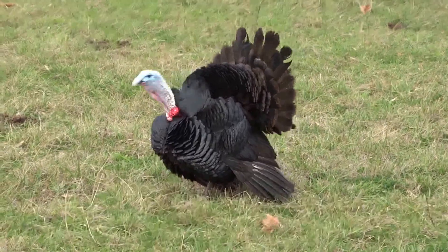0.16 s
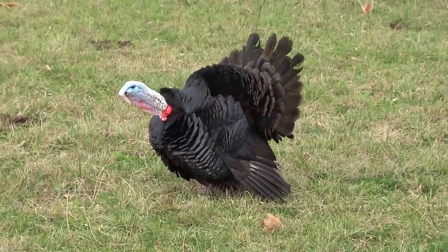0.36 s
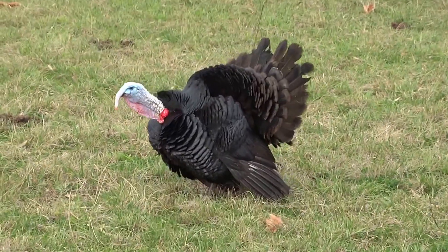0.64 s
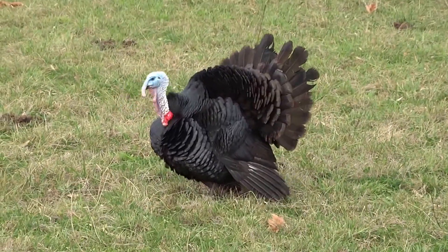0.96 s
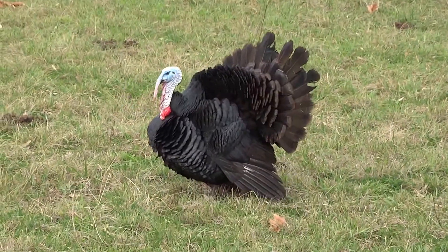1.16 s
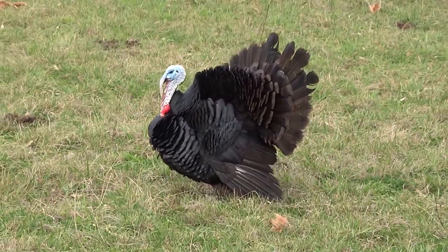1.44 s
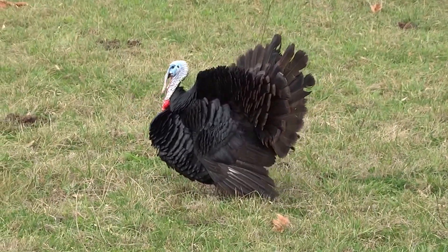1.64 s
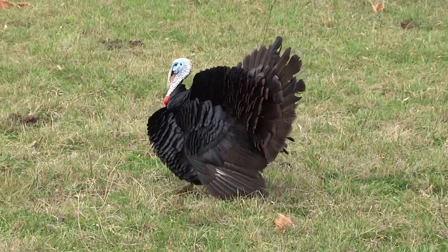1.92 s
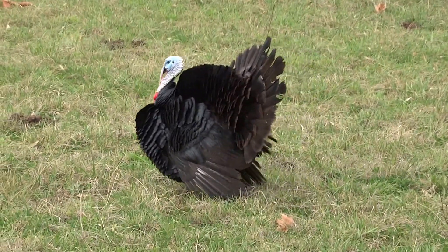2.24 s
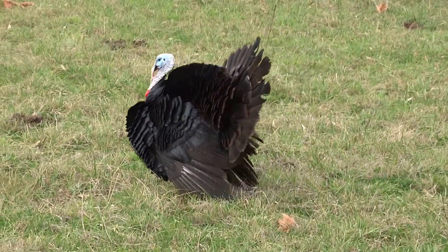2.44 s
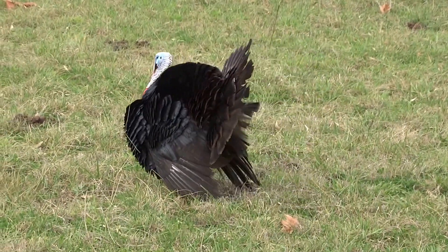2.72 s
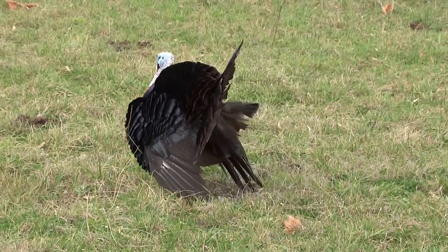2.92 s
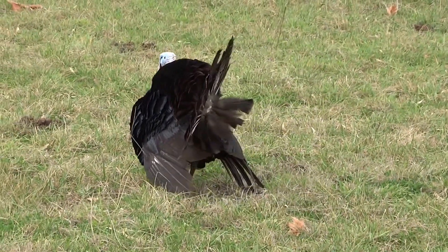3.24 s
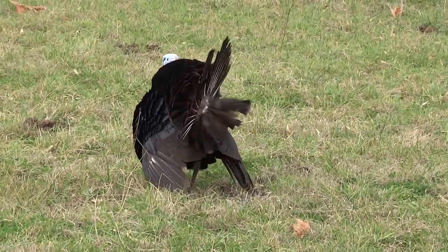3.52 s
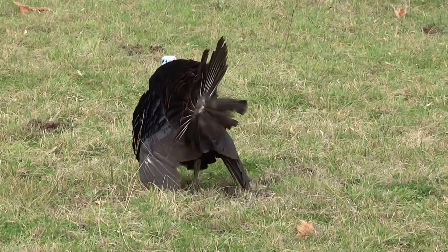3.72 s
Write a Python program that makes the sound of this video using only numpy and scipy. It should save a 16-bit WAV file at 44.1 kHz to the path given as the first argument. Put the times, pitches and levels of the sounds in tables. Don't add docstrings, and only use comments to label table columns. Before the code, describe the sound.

Close, clear turkey gobble lasting under a second in an open field, then soft footsteps and feathers brushing grass. Far fowl yelp and cry faintly; low steady rumble and soft air continue in near-centred stereo.

```python
import sys
import numpy as np
from scipy import signal
from scipy.fft import rfft, irfft, next_fast_len
from scipy.io import wavfile
from scipy.ndimage import uniform_filter1d

SR = 44100
rng = np.random.default_rng(int(sys.argv[2]) if len(sys.argv) > 2 else 0)


def to_linear_factor(level_db):
    exponent = np.asarray(level_db, float) / 20
    return 10 ** exponent


def output_pcm(signal):
    pcm = np.clip(np.atleast_2d(signal).T, -1, 1) * 32767
    wavfile.write(sys.argv[1], SR, np.round(pcm).astype(np.int16))


N = 170667
FLUTTER_HZ = 297


def rms_one(x):
    return x / np.sqrt(np.mean(x ** 2) + 1e-20)


def coloured(x, points):
    hz = np.maximum(np.arange(N // 2 + 1) * SR / N, 1)
    p = np.array(points)
    outline_db = np.interp(np.log(hz), np.log(p[:, 0]), p[:, 1], left=-99, right=-99)
    return rms_one(irfft(rfft(x) * to_linear_factor(outline_db), N))


def noise(points):
    return coloured(rng.standard_normal(N), points)


def drift(rate_hz, size):
    r = np.exp(-2 * np.pi * rate_hz / SR)
    white = rng.standard_normal(size + SR // 2)
    return rms_one(signal.lfilter([1], [1, -2 * r, r * r], white)[SR // 2:])


def swells(rows):
    t = np.arange(N) / SR
    return sum(to_linear_factor(db) * np.exp(-(2 * (t - s) / length) ** 2) for s, length, db in rows)


def controls(rows):
    s, *columns = np.transpose(rows)
    n = np.arange(max(int(s[0] * SR), 0), int(s[-1] * SR))
    glide = int(.0022 * SR) + 1
    return n, [uniform_filter1d(np.interp(n / SR, s, c), glide, mode="nearest") for c in columns]


def short_note(s, length, db, first_hz, last_hz, *beak):
    fade_db = 20
    return [(s + length * u, first_hz + (last_hz - first_hz) * u, db - fade_db * dip, *beak)
            for u, dip in [(0, 1), (.27, 0), (.65, .12), (1, 1)]]


def tones(n, hz, gains, orders, rough):
    wobble = 0.0624 * rough * drift(FLUTTER_HZ, len(n))
    phase = 2 * np.pi * np.cumsum(hz * (1 + wobble)) / SR
    depth = np.clip(rough * (1 + .3 * (orders - 1)), 0, 3)
    chance = np.array([drift(FLUTTER_HZ, len(n)) for _ in range(6)])
    flutter = (1 + depth * chance[np.arange(len(orders)) % 6]) / np.sqrt(1 + depth ** 2)
    wave = np.sum(gains * flutter * np.sin(orders * phase), axis=0)
    ends = np.minimum(1, np.minimum(n - n[0], n[-1] - n) / 60)
    return ends * wave / np.sqrt(np.sum(gains ** 2, axis=0) / 2)


def whistles(rows):
    out, one = np.zeros(N), np.ones((1, 1))
    for row in rows:
        n, (hz, db) = controls(short_note(*row))
        rough = .75 * 1500 / hz
        out[n] += to_linear_factor(db) * tones(n, hz, one, one, rough)
    return out


# frequency in Hz, level in dB per Hz.
DRONE_COLOUR = [(20, -21), (64, -18), (97, -1.5), (160, -12), (330, -20.5), (400, -51)]
# centre in Hz, width in Hz, level in dB.
DRONE_HUMPS = [(98.7, 26.8, -40.5), (132.9, 9.2, -49.5), (212.5, 20, -52.5)]
# frequency in Hz, level in dB.
HUMS = [(737, -60.5), (834, -60)]
# frequency in Hz, level in dB per Hz.
TRAFFIC_COLOUR = [(200, -8), (300, -5.5), (440, -4.5), (600, -3.5), (860, -5), (1000, -14.5)]
# frequency in Hz, level in dB per Hz.
AIR_COLOUR = [(750, -9), (1000, -2.5), (1750, 1), (3100, -6.5), (5500, -19), (7700, -20.5), (14100, -52.5)]


def background():
    drone_db, traffic_db, air_db = -39.5, -49, -52.5
    out = to_linear_factor(drone_db) * noise(DRONE_COLOUR)
    for hz, width_hz, db in DRONE_HUMPS:
        out += to_linear_factor(db) * noise([(hz + k * width_hz, -12 * abs(k)) for k in (-2, 0, 2)])
    for hz, db in HUMS:
        hum = np.sin(2 * np.pi * hz * np.arange(N) / SR)
        out += np.sqrt(2) * to_linear_factor(db + 2.0 * drift(1, N)) * hum
    out += to_linear_factor(traffic_db + 1.0 * drift(4.9, N)) * noise(TRAFFIC_COLOUR)
    return out + to_linear_factor(air_db + 1.0 * drift(13.5, N)) * noise(AIR_COLOUR)


# frequency in Hz, level in dB per Hz.
WIDE_COLOUR = [(30, -47), (103, -3.5), (800, 5), (1100, 0), (3800, -8.5), (12000, -45)]


def wide_air():
    return to_linear_factor(-59) * noise(WIDE_COLOUR)


# start in seconds, level in dB, pitch in Hz.
PEEP_CALLS = [
    (-.01, -42, 1360),
    (1.03, -49, 2060),
    (2.803, -43, 1280),
    (2.994, -57, 2800),
    (3.035, -58, 3100),
    (3.10, -50, 1300),
]


def peeps():
    length_s = 0.056
    return whistles([(s, length_s, db, hz, hz) for s, db, hz in PEEP_CALLS])


# time in seconds, pitch in Hz, level in dB, gape 0-1, brightness in dB.
LONG_1 = [(.124, 555, -35, 0.9, -24), (.13, 593, -18.5, 0.75, -19), (.14, 625, -13.5, 0.62, -33),
          (.156, 650, -11.5, 0.6, -39), (.163, 672, -23, 0.47, -30), (0.173, 700, -26, 0.35, -18),
          (0.182, 712, -20.5, 0.2, -17.5), (.189, 792, -19, 0.2, -5)]
LONG_2 = [(0.364, 515, -42, 0.54, -15), (.374, 611, -22, 0.31, -20), (.388, 677, -22.5, 0.43, -1.5),
          (0.403, 676, -24.5, 0.58, -5), (0.415, 600, -28, 0.16, -7.5), (0.43, 470, -39.5, 0.54, -31)]
LONG_3 = [(0.528, 513, -32.5, 0.35, -15), (0.541, 546.6, -20, 0.4, -19), (0.57, 640, -19.5, 0.57, 6),
          (0.578, 671, -24.5, 0.46, -18), (0.593, 663, -25.5, 0.55, 2.5), (0.605, 575, -27.5, 0.27, -6),
          (0.622, 480, -47, 0.28, -21)]
LONG_4 = [(0.777, 552, -36, 0.32, -4), (0.788, 613, -33, 0.86, -7.5), (0.799, 628, -33.5, 0.41, -10),
          (0.811, 559, -36, 0.33, 2), (0.821, 580, -43, 0.97, -3)]
LONG_HIGHS_DB = [-6.5, -5.5, -2.5, -5]
# start in seconds, length in seconds, level in dB, first Hz, last Hz.
WIDE_NOTES = [
    (.027, 0.026, -30.5, 416, 510),
    (.048, 0.025, -18, 650, 497),
]
# start in seconds, length in seconds, level in dB, first Hz, last Hz.
DULL_NOTES = [
    (.101, 0.024, -27.5, 564, 770),
    (.252, 0.019, -20, 582, 520),
    (.315, 0.017, -15.5, 557, 524),
    (.331, 0.021, -19.5, 575, 490),
    (.350, 0.019, -32.5, 673, 706),
    (.457, 0.019, -25, 528, 497),
    (.513, 0.017, -20, 576, 491),
    (.690, 0.037, -27.5, 657, 502),
]
# start in seconds, length in seconds, level in dB, first Hz, last Hz.
BRIGHT_NOTES = [
    (.186, 0.032, -22.5, 815, 596),
    (.261, 0.034, -25, 690, 528),
    (.327, 0.011, -26, 636, 577),
    (.471, 0.027, -28, 593, 497),
    (.661, 0.023, -28.5, 579, 448),
]
# start in seconds, length in seconds, level in dB, first Hz, last Hz.
LEAD_NOTES = [
    (.238, 0.017, -33.5, 632, 555),
    (.306, 0.012, -35.5, 620, 524),
    (.444, 0.017, -34, 565, 593),
    (.499, 0.021, -29.5, 577, 555),
]
# start in seconds, length in seconds, level in dB, first Hz, last Hz.
CLOSED_NOTES = [
    (.643, 0.021, -29, 617, 428),
    (.681, 0.014, -31, 423, 462),
    (.850, 0.032, -30.5, 628, 374),
]
# start in seconds, length in seconds, level in dB, first Hz, last Hz.
GULP_NOTES = [
    (.216, 0.016, -33, 610, 600),
    (.231, .01, -38, 634, 620),
    (.488, 0.014, -39, 517, 480),
    (.876, .022, -38, 765, 640),
]
# gape 0-1, brightness in dB, roughness (below 0: no flutter), level above 4
# kHz in dB.
WIDE_SHAPE = (0.69, -6, 0.24, -8)
DULL_SHAPE = (0.49, -17, 0.15, -14)
BRIGHT_SHAPE = (.38, -6, .3, -7)
LEAD_SHAPE = (1, -18, -0.14, -18)
CLOSED_SHAPE = (0.37, -15.5, 0.37, -16)
GULP_SHAPE = (0.15, -20, 0.5, -19)
# centre in Hz, width in Hz, level in dB.
THROAT_PEAKS = [(1803, 206, -4), (2784, 360, -1.5), (3096, 111, 1), (4686, 490, -14), (6900, 3050, -21.5),
                (9200, 3300, -52)]


def gobble_notes():
    long_rough = .045
    notes = []
    for rows, highs_db in zip((LONG_1, LONG_2, LONG_3, LONG_4), LONG_HIGHS_DB):
        notes.append([(*row, long_rough, highs_db) for row in rows])
    for rows, beak in [(DULL_NOTES, DULL_SHAPE), (BRIGHT_NOTES, BRIGHT_SHAPE), (LEAD_NOTES, LEAD_SHAPE),
                       (WIDE_NOTES, WIDE_SHAPE), (CLOSED_NOTES, CLOSED_SHAPE), (GULP_NOTES, GULP_SHAPE)]:
        notes += [short_note(*row, *beak) for row in rows]
    return notes


def gobble():
    shut_hz, open_hz, first_width_hz, chest_db = 650, 1750, 318, -25
    out, orders = np.zeros(N), np.arange(1, 25)[:, None]
    for rows in gobble_notes():
        n, (hz, db, gape, bright_db, rough, highs_db) = controls(rows)
        f = orders * hz
        first_hz = shut_hz + (open_hz - shut_hz) * gape
        gains = 1 / (1 + (2 * (f - first_hz) / first_width_hz) ** 2)
        gains = gains + to_linear_factor(chest_db) * (orders < 2)
        yielding_db = highs_db - .8 * np.maximum(db + 26.5, 0)
        for top_hz, width_hz, top_db in THROAT_PEAKS:
            shift_db = bright_db if top_hz < 4000 else yielding_db
            gains = gains + to_linear_factor(top_db + shift_db) / (1 + (2 * (f - top_hz) / width_hz) ** 2) ** 0.97
        uneven_db = 3.5 * np.array([drift(32, len(n)) for _ in range(5)])[orders[:, 0] % 5]
        effort_db = .7 * np.minimum(db + 24.0, 0)
        gains = gains * to_linear_factor(uneven_db * (orders > 2) + effort_db * (f > 4000))
        gains = gains / (1 + (f / 11000) ** 4)
        out[n] += to_linear_factor(db) * tones(n, hz, gains, orders, rough)
    return out


def port_skew(voice):
    quarter_turn = np.imag(signal.hilbert(voice, next_fast_len(N))[:N])
    low_pass = signal.butter(1, 2200, fs=SR, output="sos")
    return to_linear_factor(-17) * signal.sosfiltfilt(low_pass, quarter_turn)


def echoes(x):
    far_db, far_t60_s = -17, .9
    near_db, near_t60_s = -13, .14
    apart_share = .3
    t = np.arange(SR // 2) / SR
    fall = to_linear_factor(far_db - 60 * t / far_t60_s) / np.sqrt(far_t60_s)
    fall = fall + to_linear_factor(near_db - 60 * t / near_t60_s) / np.sqrt(near_t60_s)
    scatter = rng.standard_normal((2, len(t))) * fall * (t > .008)
    both, apart = signal.lfilter([1, -.8], [1], scatter)
    tail = (both + apart_share * apart * [[1], [-1]]) * np.sqrt(6 * np.log(10) / SR)
    return signal.fftconvolve(x[None], tail, axes=1)[:, :N]


# centre in seconds, length in seconds, level in dB.
BREATH_SWELLS = [
    (.35, 0.44, -56),
    (.7, 0.5, -55),
]
# frequency in Hz, level in dB per Hz.
BREATH_COLOUR = [(900, -5), (1500, 0), (3100, -2.5), (3800, -9), (4700, -2), (7000, -16), (10000, -33)]


def breath_hiss():
    return swells(BREATH_SWELLS) * noise(BREATH_COLOUR)


# time in seconds, level in dB.
STALK_SNAPS = [
    (1.205, -65),
    (1.385, -46),
    (1.655, -56),
    (2.243, -45),
    (2.416, -37.5),
    (3.343, -45.5),
]


def stalk_snaps():
    t = np.arange(N) / SR
    band = signal.butter(2, [5000, 9500], "band", fs=SR, output="sos")
    crack = signal.sosfilt(band, rng.standard_normal(N))
    decay_s = 0.0035
    out = np.zeros(N)
    for s, db in STALK_SNAPS:
        out += to_linear_factor(db) * crack * (t >= s) * np.exp(-np.maximum(t - s, 0) / decay_s)
    return out


# centre in seconds, length in seconds, level in dB.
WING_BRUSHES = [
    (1.29, .12, -48.5),
]


def wing_thump():
    return swells(WING_BRUSHES) * noise(TRAFFIC_COLOUR)


# centre in seconds, length in seconds, level in dB.
FEATHER_DRAGS = [
    (1.4, 0.34, -61),
    (1.65, 0.051, -60),
    (1.9, 0.22, -64),
    (2.25, 0.37, -56.5),
    (2.75, 0.49, -61.5),
    (3.55, 0.57, -60.5),
]
# frequency in Hz, level in dB per Hz.
RUSTLE_COLOUR = [(2000, -11), (3500, -16), (5300, -2.5), (7800, 4.5), (9500, -6), (11300, -14.5),
                 (15500, -49)]


def feather_drag():
    grain_db = 2.0 * rng.exponential(1, N) + 2.0 * drift(40, N)
    grains = rng.standard_normal(N) * to_linear_factor(grain_db)
    return swells(FEATHER_DRAGS) * coloured(grains, RUSTLE_COLOUR)


# start in seconds, length in seconds, level in dB, first Hz.
YELP_CALLS = [
    (1.613, 0.036, -44.5, 1750),
    (1.907, 0.033, -44, 1750),
    (2.198, 0.055, -42, 1750),
    (2.492, 0.059, -45, 1750),
    (2.775, 0.0426, -39.5, 1750),
    (3.072, 0.048, -45.5, 1750),
]


def yelps():
    upper = [(s, length, db, hz, hz * .8) for s, length, db, hz in YELP_CALLS]
    lower = [(s, length, db - 4.5, hz * .86, hz * .86) for s, length, db, hz in YELP_CALLS]
    return whistles(upper + lower)


# time in seconds, pitch in Hz, level in dB.
HIGH_CRY = [(1.75, 950, -54), (1.85, 940, -49), (2.3, 880, -53), (2.75, 850, -62)]
LOW_CRY = [(1.83, 750, -62), (1.95, 700, -50), (2.15, 610, -48), (2.55, 585, -58)]
HIGH_CRY_TONES = [2, 4]
LOW_CRY_TONES = [2, 4, 5, 6]


def cries():
    tilt_db, patchy_db, rough = -3.2, 3.5, .42
    out = np.zeros(N)
    for rows, parts in [(HIGH_CRY, HIGH_CRY_TONES), (LOW_CRY, LOW_CRY_TONES)]:
        n, (hz, db) = controls(rows)
        k = np.array(parts)[:, None]
        level = to_linear_factor(db + patchy_db * drift(16.6, len(n)))
        out[n] += level * tones(n, hz, to_linear_factor(tilt_db * k), k, rough)
    return out


# start in seconds, level in dB, first Hz.
CHIP_CALLS = [
    (1.98, -45, 890),
    (2.28, -43, 920),
    (2.57, -45, 885),
    (3.228, -57, 4750),
    (3.515, -57, 4700),
]


def chips():
    length_s, rise = 0.026, 1.16
    return whistles([(s, length_s, db, hz, hz * rise) for s, db, hz in CHIP_CALLS])


# centre in seconds, level in dB.
FOOTSTEPS = [
    (1.88, -63),
    (2.24, -53.5),
    (2.522, -51),
    (2.72, -50.5),
    (3.10, -51),
    (3.292, -53),
    (3.6, -55),
]
# frequency in Hz, level in dB per Hz.
SWISH_COLOUR = [(900, -8), (1500, -1), (2500, -5), (5000, -10), (7000, -35)]


def footsteps():
    length_s = 0.077
    swish = swells([(s, length_s, db) for s, db in FOOTSTEPS])
    return swish * to_linear_factor(2.9 * drift(49, N)) * noise(SWISH_COLOUR)


def scene():
    far_echo_db, pan_db = 9, -.3
    voice = gobble()
    far = peeps() + yelps() + cries() + chips()
    strut = breath_hiss() + stalk_snaps() + wing_thump() + feather_drag() + footsteps()
    around = far + strut + background()
    side = wide_air() + port_skew(voice)
    pan = to_linear_factor(np.array([[pan_db / 2], [-pan_db / 2]]))
    return voice + echoes(voice + to_linear_factor(far_echo_db) * far) + around * pan + side * [[1], [-1]]


def top_cut(x):
    return signal.sosfilt(signal.butter(12, 15670, fs=SR, output="sos"), x)


def record(dry):
    return top_cut(dry)


dry = scene()
out = record(dry)
output_pcm(out)
```